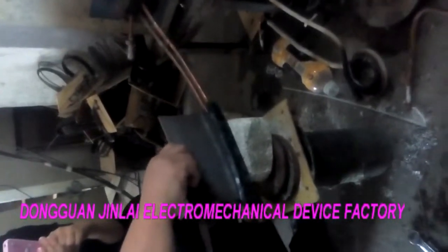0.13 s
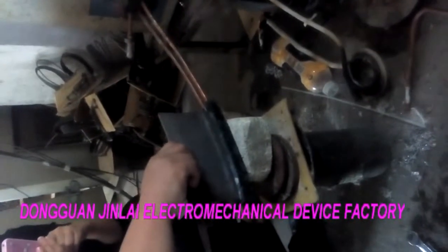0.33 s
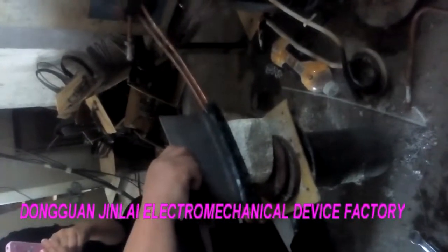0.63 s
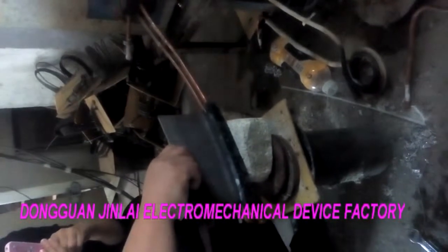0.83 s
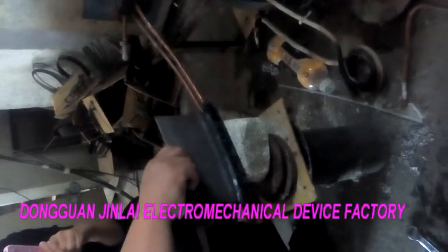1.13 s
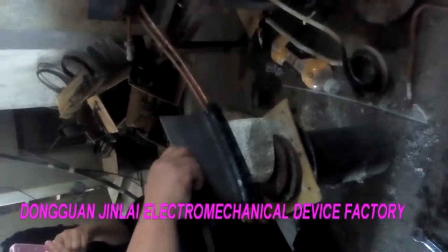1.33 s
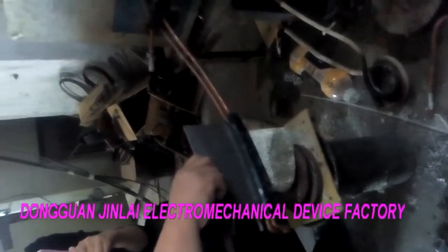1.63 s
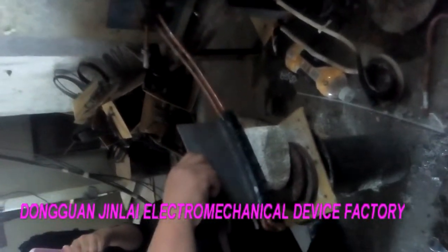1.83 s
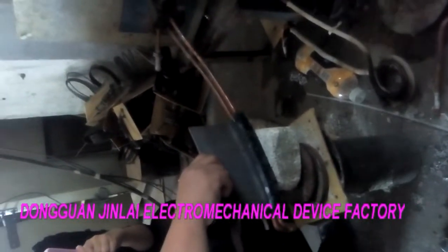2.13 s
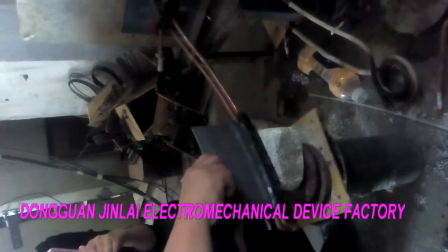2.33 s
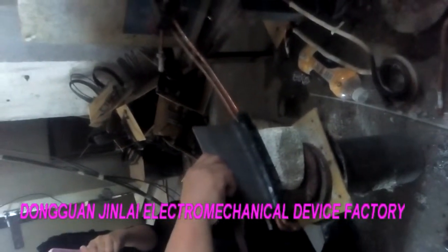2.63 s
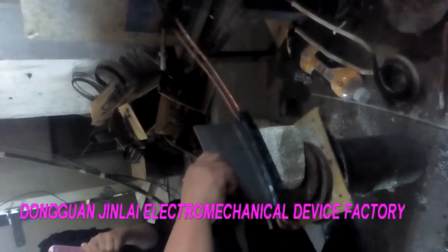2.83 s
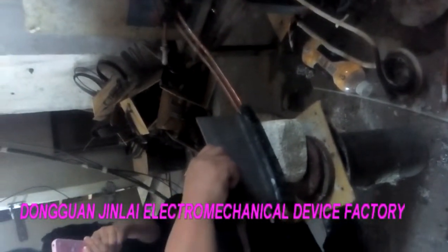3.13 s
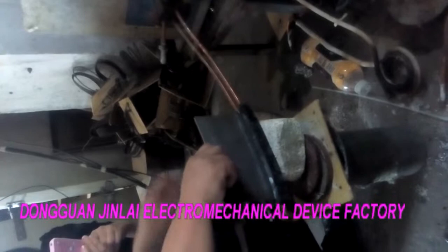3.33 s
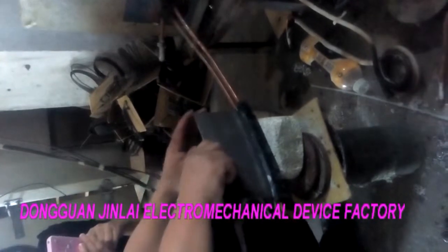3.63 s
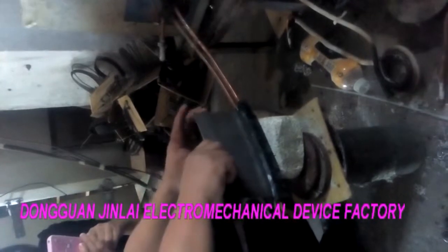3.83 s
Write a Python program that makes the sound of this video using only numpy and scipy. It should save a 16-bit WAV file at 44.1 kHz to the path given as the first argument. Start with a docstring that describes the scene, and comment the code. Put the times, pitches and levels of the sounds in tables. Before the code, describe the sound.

Continuous sharp hiss of spraying water, close and left-heavy, opens with a brief midrange rush, then holds steady with slight flutter over faint inverter whine, motor hum and workshop air, with short metallic reflections.

```python
"""A dense, bright hiss, loudest on the left: cooling water sprays by an induction heating machine in a workshop.
The spray is random bursts over noise, with metal echoes; the inverter whine is drifting sines plus resonant noise.
A pump hums and a fan motor sings (wavering sines) over a low rush of air (shaped noise). A narrow, faint ringing
swells about every 1.3 s; a midrange rush and a low drone, also resonant noise, fade at the start and waver."""
import sys
import numpy as np
from scipy import signal
from scipy.fft import rfft, irfft, next_fast_len
from scipy.io import wavfile
from scipy.ndimage import uniform_filter1d, minimum_filter1d

SR = 44100
rng = np.random.default_rng(int(sys.argv[2]) if len(sys.argv) > 2 else 0)


def materialize(psi):
    """Save the field psi as 16-bit PCM at rate SR to the path in sys.argv[1].

    A 1-D psi becomes a single channel; in a 2-D psi each row is a channel.
    """
    bounded = np.clip(np.atleast_2d(psi).T, -1, 1)
    quanta = np.round(bounded * 32767).astype(np.int16)
    wavfile.write(sys.argv[1], SR, quanta)


N = 175959
T_S = np.arange(N) / SR
FFT_SIZE = next_fast_len(N, True)
FREQS_HZ = np.maximum(np.fft.rfftfreq(FFT_SIZE, 1 / SR), 1)

# spray spectrum, near = left: (frequency [Hz], relative density [dB per Hz])
SPRAY_NEAR_SPECTRUM = [(800, -33), (1500, -21), (2100, -15.5), (2700, -8.5), (3400, -4.5), (3750, -4.5),
                       (4500, -1.5), (5850, 2), (6550, -2), (6850, -11), (8000, -24.5), (9800, -31.5),
                       (12000, -34.5), (15000, -39.5)]
# spray spectrum, far = right: (frequency [Hz], relative density [dB per Hz])
SPRAY_FAR_SPECTRUM = [(800, -20.5), (1500, -11.5), (2100, -7.5), (2700, -4), (3400, -3.5), (4500, 0),
                      (5800, 1), (6550, -.5), (7000, -1.5), (8000, -14), (9800, -15.5), (12000, -22),
                      (15000, -27.5)]
# spray flow below and above SPLIT_HZ: (time [s], relative lower level [dB], relative upper level [dB])
SPRAY_FLOW = [(0, 3, 0), (.12, 1.9, -1.5), (.25, 2.8, -.6), (.38, 1, 0.5), (.52, 1.6, 0), (.68, 1, -0.2),
              (1.05, 1, -.1), (1.4, 1.2, -0.1), (1.57, 1.3, 0.2), (1.88, 1.2, 0.1), (2.35, 1.3, 0),
              (2.72, 1.9, 1), (3.05, 2.1, -0.1), (3.25, 1.6, 1.4), (3.5, 1.2, 1.2), (3.72, 2, 0.7),
              (3.99, 0.5, 1)]
# inverter whine: (multiple of drive frequency, left [dB], right [dB], noise-to-tone ratio [0-1], waver [dB])
INVERTER_WHINE = [(1, -38.5, -47, .1, .6), (2, -28, -45.5, .35, 1.5)]
# coil ringing near the second multiple: (frequency [Hz], half-width [Hz], left [dB], right [dB])
COIL_RESONANCE = (3462, 75, -29, -40)
# pump hum: (multiple of shaft rate, left [dB], right [dB])
PUMP_HUM = [(2, -49, -48.5), (3, -37.5, -36.5), (4, -49, -47.5), (5, -48, -74), (6, -52.5, -46),
            (11, -62, -54)]
# fan motor tones, with mains sidebands: (frequency [Hz], left [dB], right [dB], lead of left [rad])
FAN_TONES = [(530.4, -53.5, -48.5, -0.96), (626.6, -39, -40, 0.026), (731, -51, -49.5, -1.14),
             (1186, -58, -56, -0.46)]
# uneven low drone: (frequency [Hz], half-width [Hz], level [dB])
LOW_DRONE = (300, 10, -50.5)
# midrange rush at the start: (frequency [Hz], half-width [Hz], initial level [dB])
EARLY_RUSH_BANDS = [(940, 220, -33.5), (1700, 61, -31)]
# faint ringing swells: (peak time [s], left peak level [dB])
RING_SWELLS = [(.29, -35), (1.58, -33), (2.92, -35)]
# workshop air rush spectrum: (frequency [Hz], relative density [dB per Hz])
AIR_SPECTRUM = [(20, -8), (40, -12), (68, -14), (95, -3), (160, -2), (240, -5), (330, 1.5), (480, -1.5),
                (650, -2), (900, -6), (1300, -8), (2200, -17.5), (5000, -43.5)]
# left-right correlation of the air rush: (frequency [Hz], correlation [0-1])
AIR_CORRELATION = [(60, 1), (150, 0.94), (300, 0.94), (600, 0.52), (1000, 0.1), (1500, 0)]

# spray
NEAR_DB, FAR_DB = -11, -22
BURSTS_PER_S, BURST_SPREAD_DB, BURST_POWER_SHARE = 9000, 2.5, 0.33
FLUTTER_DB, FLUTTER_HZ, SURGE_DB, SURGE_HZ, SPLIT_HZ = 0.78, 18, 0.19, 7.7, 5200
REFLECT_DB, REFLECT_DECAY_S = -6, 0.022
# inverter
INVERTER_HZ, INVERTER_DRIFT_HZ, DRIFT_RATE_HZ = 1715.6, 0.6, 2.07
WHINE_HALF_WIDTH_HZ, WHINE_LEFT_LEAD_RAD, WHINE_WAVER_HZ = 10, -0.59, 8
# motors
SHAFT_HZ = 43.26
HUM_WAVER_DB, HUM_WAVER_HZ, HUM_PHASE_RAD, HUM_PHASE_HZ = -0.5, 5.97, 0.067, 2.84
# early rush, ringing, air
EARLY_FADE_S = 0.16
RING_HZ, RING_HALF_WIDTH_HZ, RING_SPREAD_S, RING_RIGHT_DB = 2280, 35, 0.06, -6
AIR_DB = -34
# output
LIMIT, LIMIT_S, TOP_HZ = 0.93, 0.002, 15150


def undb(db):
    """Decibels to gain."""
    return 10 ** (np.asarray(db) / 20)


def unit(x):
    """Scale to rms 1."""
    return x / np.sqrt(np.mean(x ** 2))


def over_hz(points):
    """Join (frequency [Hz], value) points on a log-frequency axis."""
    hz, value = np.array(points).T
    return np.interp(np.log(FREQS_HZ), np.log(hz), value)


def shape(x, gain):
    """Filter by a gain per frequency."""
    return irfft(rfft(x, FFT_SIZE) * gain, FFT_SIZE)[:N]


def walk(rate_hz):
    """Random levels held 1 / rate_hz s, smoothed twice; spread near 1."""
    k = int(SR / rate_hz)
    steps = np.repeat(rng.standard_normal(256), k)[:N]
    return 1.39 * uniform_filter1d(uniform_filter1d(steps, k), k)


def resonance(hz, half_width_hz):
    """Noise ringing in one resonance, rms 1; -6 dB at the half-width."""
    gain = 1 / (1 + ((FREQS_HZ - hz) / half_width_hz) ** 2)
    return unit(shape(rng.standard_normal(N), gain))


def reflect(x):
    """Add a quickly fading cluster of echoes from nearby metal surfaces."""
    echoes = rng.standard_normal(N) * np.exp(-T_S / REFLECT_DECAY_S) * (T_S > 0.001)
    echoes /= np.sqrt(np.sum(echoes ** 2))
    return shape(x, 1 + undb(REFLECT_DB) * rfft(echoes, FFT_SIZE))


def spray_jet():
    """Tiny random-sign bursts over smooth jet noise, rms near 1, with echoes."""
    size = undb(BURST_SPREAD_DB * np.minimum(rng.exponential(size=N), 6))
    bursts = (rng.random(N) < BURSTS_PER_S / SR) * rng.choice([-1, 1], N) * size
    smooth = rng.standard_normal(N)
    return reflect(np.sqrt(BURST_POWER_SHARE) * unit(bursts) + np.sqrt(1 - BURST_POWER_SHARE) * smooth)


def spray():
    """Water jet per side; each frequency band flutters alike on both sides, and the whole jet surges."""
    time_s, lower_db, upper_db = np.array(SPRAY_FLOW).T
    centres_hz = np.linspace(0, SR / 2, num=32)
    spacing_hz = centres_hz[1]
    flutter = []
    for hz in centres_hz:
        flow_db = np.interp(T_S, time_s, upper_db if hz > SPLIT_HZ else lower_db)
        flutter.append(undb(FLUTTER_DB * walk(FLUTTER_HZ) + flow_db))
    sides = []
    for spectrum, db in ((SPRAY_NEAR_SPECTRUM, NEAR_DB), (SPRAY_FAR_SPECTRUM, FAR_DB)):
        jet = spray_jet()
        fluttering = np.zeros(N)
        for hz, gain in zip(centres_hz, flutter):
            # overlapping triangular bands sum to 1
            band = np.maximum(1 - abs(FREQS_HZ - hz) / spacing_hz, 0)
            fluttering += gain * shape(jet, band)
        sides.append(undb(db) * unit(shape(fluttering, undb(over_hz(spectrum)))))
    return undb(SURGE_DB * walk(SURGE_HZ)) * np.array(sides)


def inverter():
    """The coil whines at the drive frequency and, more roughly, at twice that, where it also rings."""
    drive_hz = INVERTER_HZ + INVERTER_DRIFT_HZ * walk(DRIFT_RATE_HZ)
    phase = 2 * np.pi * np.cumsum(drive_hz) / SR
    out = np.zeros((2, N))
    for multiple, left_db, right_db, roughness, waver_db in INVERTER_WHINE:
        waver = waver_db * walk(WHINE_WAVER_HZ)
        for side, (db, lead_rad) in enumerate(((left_db, WHINE_LEFT_LEAD_RAD), (right_db, 0))):
            clean = np.sqrt(2) * np.sin(multiple * phase + lead_rad)
            rough = roughness * resonance(multiple * INVERTER_HZ, WHINE_HALF_WIDTH_HZ)
            out[side] += undb(db + waver) * (clean + rough)
    hz, half_width_hz, left_db, right_db = COIL_RESONANCE
    coil = np.array([undb(db) * resonance(hz, half_width_hz) for db in (left_db, right_db)])
    return out + coil


def early_rush():
    """Midrange noise resonances, independent per side, decay exponentially from the start."""
    sides = []
    for _ in range(2):
        sides.append(sum(undb(db) * resonance(hz, width_hz) for hz, width_hz, db in EARLY_RUSH_BANDS))
    return np.exp(-T_S / EARLY_FADE_S) * np.array(sides)


def tone(hz, left_db, right_db, left_lead_rad=0):
    """Steady machine tone wavering slightly in level and phase."""
    phase = 2 * np.pi * (hz * T_S + rng.random()) + HUM_PHASE_RAD * walk(HUM_PHASE_HZ)
    left = undb(left_db) * np.sin(phase + left_lead_rad)
    right = undb(right_db) * np.sin(phase)
    return np.sqrt(2) * undb(HUM_WAVER_DB * walk(HUM_WAVER_HZ)) * np.array([left, right])


def motors():
    """Pump hums on shaft-rate multiples; fan motor sings above; a narrow-band noise drone wavers."""
    pump = sum(tone(multiple * SHAFT_HZ, left_db, right_db) for multiple, left_db, right_db in PUMP_HUM)
    fan = sum(tone(*row) for row in FAN_TONES)
    hz, half_width_hz, db = LOW_DRONE
    return pump + fan + undb(db) * resonance(hz, half_width_hz)


def ringing():
    """Narrow-band noise under Gaussian swells."""
    swell = sum(undb(db) * np.exp(-0.5 * ((T_S - at_s) / RING_SPREAD_S) ** 2) for at_s, db in RING_SWELLS)
    return swell * np.array([undb(db) * resonance(RING_HZ, RING_HALF_WIDTH_HZ) for db in (0, RING_RIGHT_DB)])


def air():
    """Low noise rush, alike on both sides in the bass and diffuse above."""
    correlation = np.clip(over_hz(AIR_CORRELATION), 0, 1)
    colour = undb(over_hz(AIR_SPECTRUM))
    mid = shape(rng.standard_normal(N), colour * np.sqrt(1 + correlation))
    side = shape(rng.standard_normal(N), colour * np.sqrt(1 - correlation))
    return undb(AIR_DB) * unit(np.array([mid + side, mid - side]))


def scene():
    """Sum of all sources, left and right."""
    return spray() + inverter() + early_rush() + motors() + ringing() + air()


def record(dry):
    """Limit the highest peaks, each side separately, then low-pass steeply at TOP_HZ."""
    k = int(LIMIT_S * SR)
    needed_gain = LIMIT / np.maximum(abs(dry), LIMIT)
    gain = uniform_filter1d(minimum_filter1d(needed_gain, k), k)
    low_pass = signal.ellip(10, 0.1, 70, TOP_HZ, fs=SR, output="sos")
    return signal.sosfilt(low_pass, dry * gain)


dry = scene()
out = record(dry)
materialize(out)
```